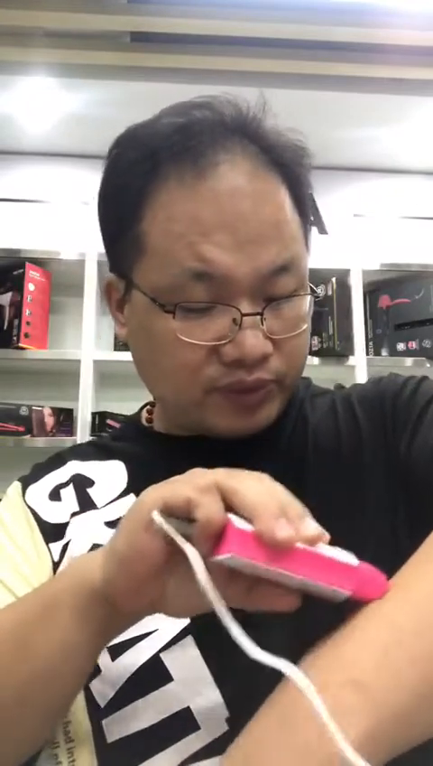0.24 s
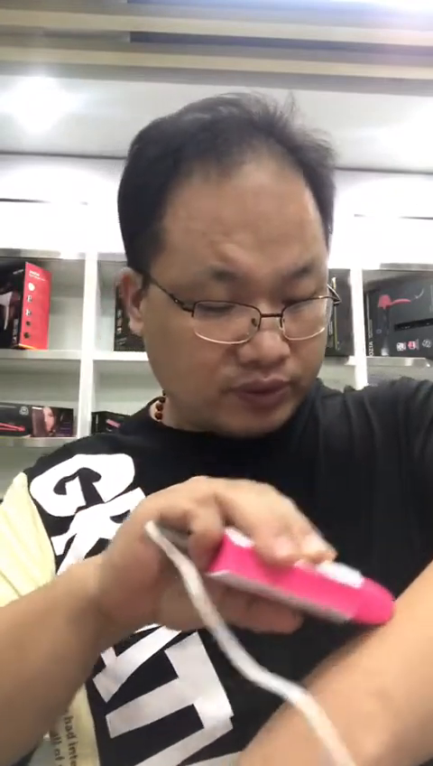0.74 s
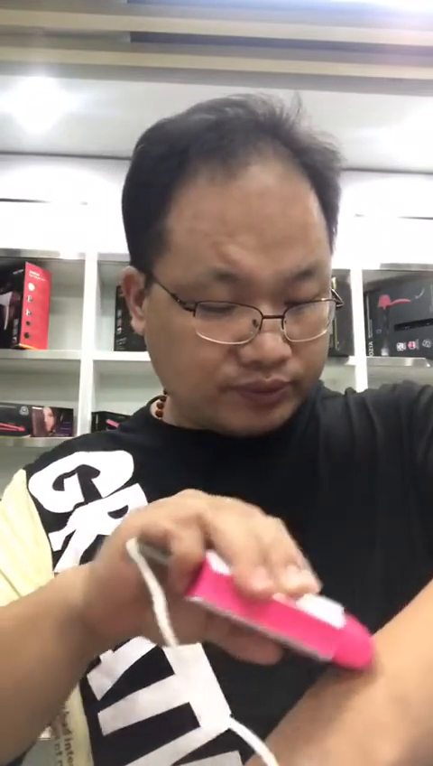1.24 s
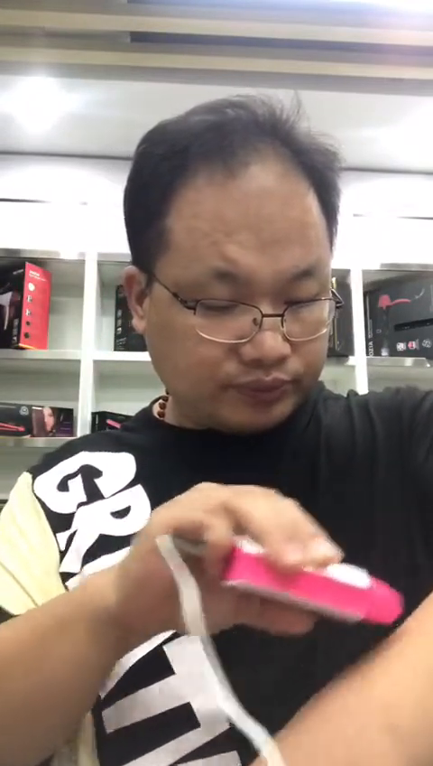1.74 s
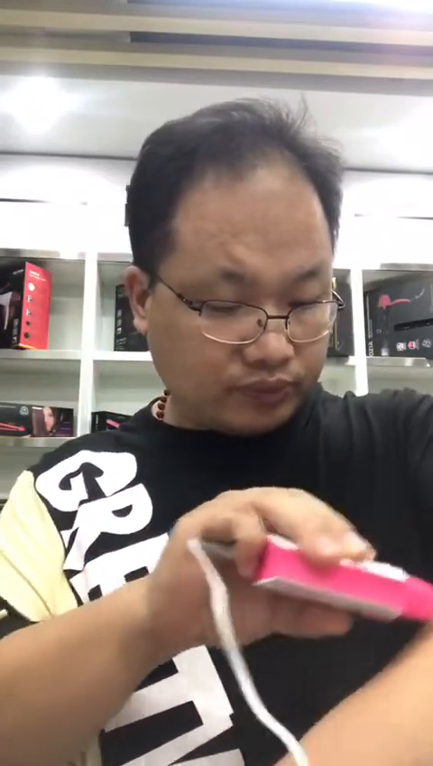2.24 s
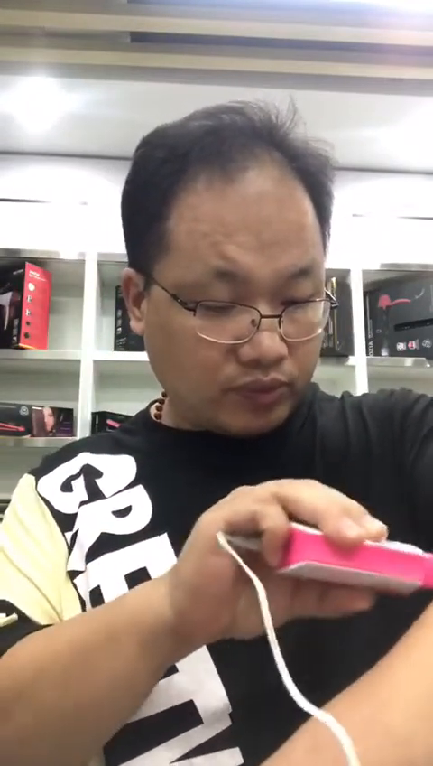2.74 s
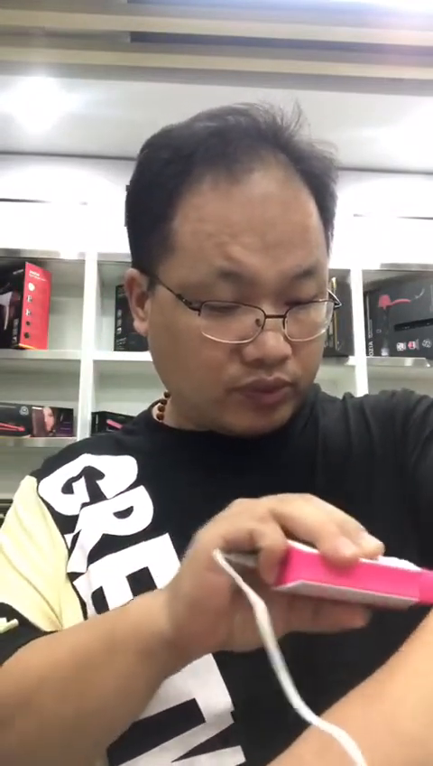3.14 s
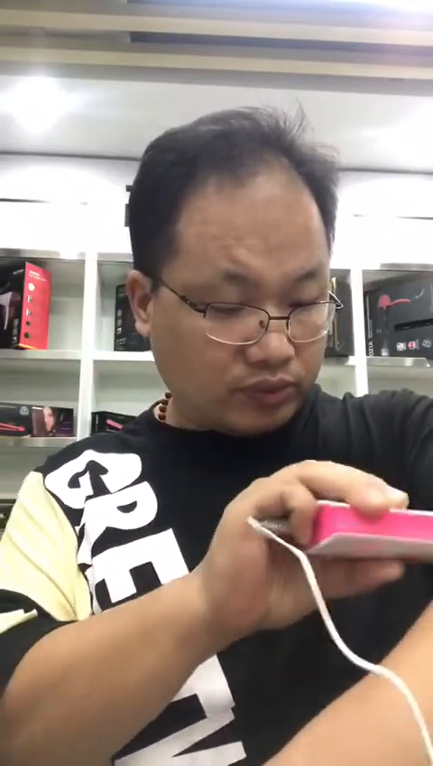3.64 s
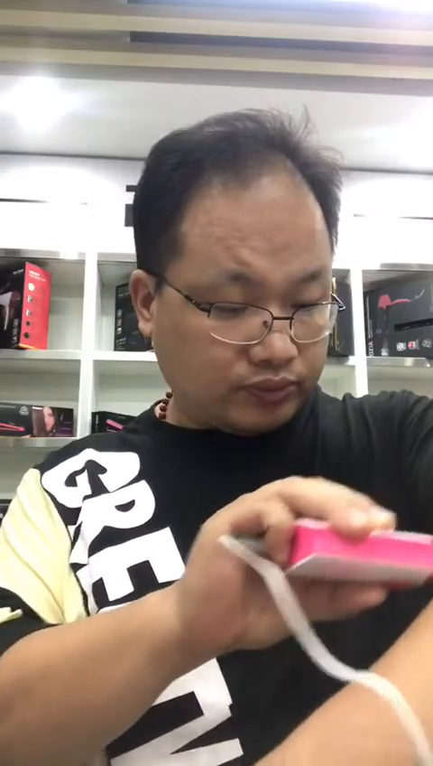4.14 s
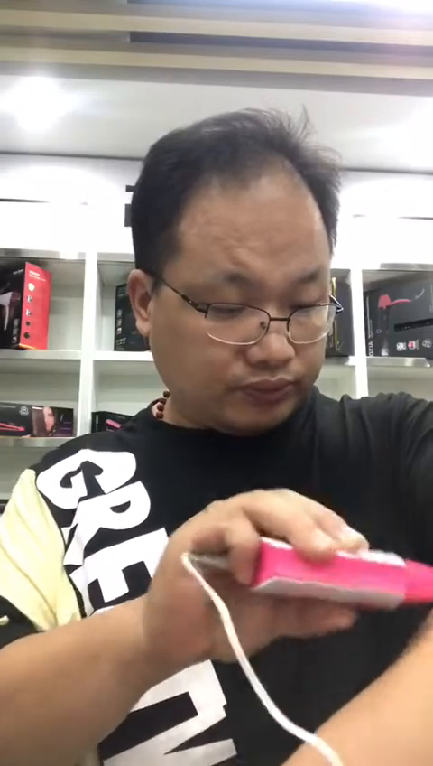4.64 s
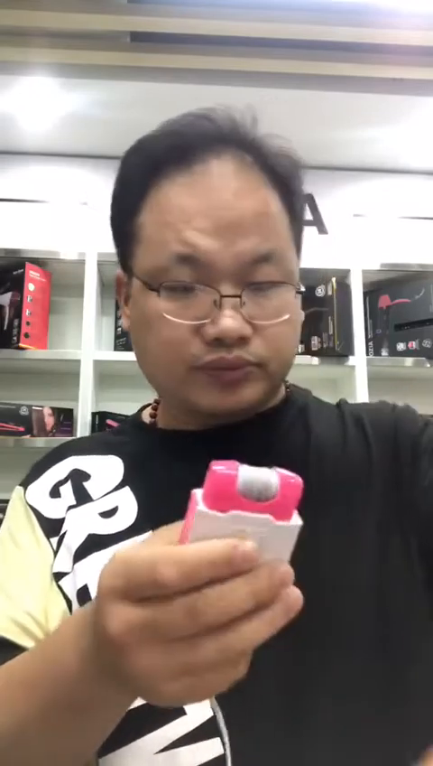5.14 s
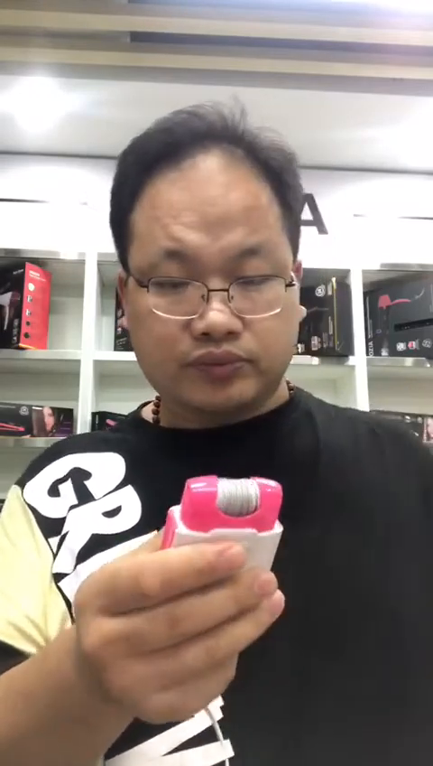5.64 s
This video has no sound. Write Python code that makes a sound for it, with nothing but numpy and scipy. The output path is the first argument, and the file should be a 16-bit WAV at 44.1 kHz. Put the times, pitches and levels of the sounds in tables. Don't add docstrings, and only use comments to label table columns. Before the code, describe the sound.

Close, phone-like, essentially mono capture of a handheld hair-removal device indoors. A dense metallic buzz with high motor whine runs continuously, with tiny pitch dips and bright crackly bursts while on skin. After leaving the arm it sounds more open and tonal, with a faster once-per-turn throb. Just before the end the power cuts and the motor droops, over soft low room ventilation.

```python
import sys
import numpy as np
from scipy import signal
from scipy.fft import rfft, irfft
from scipy.io import wavfile
from scipy.ndimage import uniform_filter1d

SR = 44100
rng = np.random.default_rng(int(sys.argv[2]) if len(sys.argv) > 2 else 0)


def file_out(sig):
    cols = np.atleast_2d(sig).T
    lim = np.clip(cols, -1, 1)
    pcm = np.round(lim * 32767).astype(np.int16)
    wavfile.write(sys.argv[1], SR, pcm)


def level_to_linear(level):
    exponent = np.asarray(level, float) / 20
    return 10 ** exponent


N = 259119
TEETH, CLAPS = 26, 6
MOTOR_ORDER = 4.52

# (time [s], share [0-1])
FACING = [
    (0, 0),
    (4.6, 0),
    (5.0, 0.97),
    (5.88, 0.9),
]
# (time [s], loss [dB], half length [s])
HIDDEN = [
    (1.3, -6, 0.099),
    (1.9, 12, 0.14),
    (2.5, -1.5, 0.86),
    (3.3, 10.5, 0.27),
    (4.2, 3.5, 0.17),
    (4.43, -1, 0.076),
    (1, 0, 0.13),
    (5.63, -0.5, 0.12),
    (5.2, 6, 0.12),
]


def rms_one(x):
    return x / np.sqrt(np.mean(x ** 2) + 1e-20)


def in_time(rows, at):
    s, *columns = np.transpose(rows)
    return [np.interp(at, s, c) for c in columns]


def at_hz(points, hz):
    point_hz, level_db = np.array(points).T
    return np.interp(np.log(hz + 1), np.log(point_hz), level_db)


def bell(hz, mid_hz, width_hz):
    return np.exp(-.5 * ((hz - mid_hz) / width_hz * 2) ** 2)


def bumps(rows, at):
    return sum(height * np.clip(1 - abs(at - s) / half_s, 0, 1) for s, height, half_s in rows)


def drift(rate):
    r = np.exp(-80 * np.pi * rate / SR)
    slow = signal.lfilter([1], [1, -2 * r, r * r], rng.standard_normal(N // 40 + 2002))[2000:]
    return np.interp(np.arange(N) / 40, np.arange(len(slow)), rms_one(slow))


def per_turn(turns, size):
    pattern = np.resize(rng.standard_normal(size), size + 1)
    return np.interp(turns % 1 * size, np.arange(size + 1), pattern)


def coasting(at):
    switch_off_s, halving_s = 5.675, .19
    knee_s = .013
    return 1 / (1 + knee_s * np.logaddexp(0, (at - switch_off_s) / knee_s) / halving_s)


def drive(s):
    # (time [s], mesh rate [Hz])
    pressure = [(0.05, 904), (.25, 901.5), (.4, 899.3), (.6, 903.6), (.75, 906.6), (1.05, 897),
                (1.2, 902.2), (1.55, 903.3), (1.75, 903.3), (2.1, 901.1), (2.4, 896.3), (2.95, 896),
                (3.1, 895.4), (3.45, 906), (3.7, 898.7), (3.9, 895.9), (4.3, 897.9), (4.5, 898.6),
                (4.7, 905.2), (4.9, 899.5), (5.0, 900), (5.18, 900.5), (5.35, 898.9), (5.5, 893.3),
                (5.88, 900)]
    # (time [s], mesh drop [Hz], half length [s])
    snags = [
        (.14, 11, .07),
        (.88, 5, 0.06),
        (1.37, 30, .12),
        (2.33, 5, 0.059),
        (2.7, 7, .07),
        (3.0, 3, .05),
        (3.58, 14, 0.061),
        (4.4, 15, .09),
        (5.665, 10, .05),
    ]
    mesh_hz = (in_time(pressure, s)[0] - bumps(snags, s)) * coasting(s)
    turns = np.cumsum(uniform_filter1d(mesh_hz, size=1300)) / SR / TEETH
    notch_s = 5.459
    return mesh_hz, turns - turns[int(notch_s * SR)] + .5


def contacts(turns, repeat, clap_db, wobble_db, grain_db):
    clap = np.pi * CLAPS * turns
    gate_db = clap_db * (.8 * np.cos(2 * clap) + np.cos(clap) + .4 * np.cos(4 * clap))
    gate_db = gate_db + wobble_db * per_turn(turns, size=13)
    low_hz, high_hz = 5600, 11000
    fresh = np.zeros(N)
    for edge, kind in ((low_hz, "low"), ((low_hz, high_hz), "band"), (high_hz, "high")):
        part = signal.butter(4, edge, kind, fs=SR, output="sos")
        grains = level_to_linear(gate_db + grain_db * drift(155)) * rng.standard_normal(N)
        fresh += signal.sosfilt(part, grains)
    fine_marks = signal.butter(4, 1600, "high", fs=SR, output="sos")
    marks = signal.sosfilt(fine_marks, per_turn(turns, size=1200))
    return np.sqrt(1 - repeat) * rms_one(fresh) + np.sqrt(repeat) * rms_one(marks)


def rattle_levels(at, facing):
    # (time [s], rattle level [dB], upper casing uncovered [dB])
    grip = [(0, -0.5, 2), (.5, 1, 1), (.85, 0.5, 0), (1.2, 0.5, 1), (1.45, 0.5, -2), (1.6, 1.5, 2),
            (2.0, 0, -1.5), (2.3, 0, 2.5), (2.7, 0.5, -0.5), (3.0, 0.5, 1), (3.25, 0, 0), (3.5, 0.5, -1),
            (4.1, 0.5, -0.5), (4.5, 0, -1), (4.7, 0, 0.5), (4.85, -0.5, 0), (5.3, 1.5, 2.5), (5.7, 0, 0)]
    # (on skin [dB], in air [dB], share of the uncovering, power of speed, loose parts rattle on [s])
    regions = [
        (-54.5, -52, .3, 1.07, .005),
        (-49.5, -49.5, -0.3, 1.45, 0.03),
        (-51.5, -53.5, 1., 1.5, 0.02),
        (-54.5, -52, -0.15, 2.02, 0.033),
    ]
    # (time [s], top region lift [dB], half length [s])
    plucks = [(.1, 1.5, 0.054), (.68, -1, .1), (1.23, 4, 0.072), (2.25, 4, 0.11), (2.55, 3, 0.11),
              (3.05, 2.5, 0.11), (3.52, 2, 0.044), (4.45, 0.5, 0.11), (1.6, 1.5, .1), (4.62, 1, .06),
              (3.8, 2, 0.063)]
    # (time [s], loss [dB], half length [s])
    lift_off = [
        (4.83, 5.5, 0.12),
    ]
    level_db, uncovered_db = in_time(grip, at)
    levels = []
    for skin_db, air_db, share, power, lag_s in regions:
        aim_db = skin_db + (air_db - skin_db) * facing
        speed_db = power * 20 * np.log10(coasting(at - lag_s))
        levels.append(aim_db + level_db + share * uncovered_db + speed_db)
    stubble_db = 1 * np.interp(at * SR, np.arange(N), drift(6.))
    hidden_db = -.16 * bumps(HIDDEN, at)
    return np.array(levels) + [hidden_db, -bumps(lift_off, at), 0 * at, bumps(plucks, at) + stubble_db]


def casing(x, patchy_db, low_trim_db):
    # (frequency [Hz], level [dB per Hz])
    on_skin = [(290, -49), (500, -22), (1440, -7.5), (1640, -10.5), (1750, -9.5), (2660, 0), (3060, -7.5),
               (4220, -7.5), (4920, -10.5), (6500, -8), (7580, -11.5), (9090, -7), (14000, -16.5)]
    # (frequency [Hz], level [dB per Hz])
    in_air = [(290, -78), (500, -30.5), (815, -17.5), (963, -25), (1030, -18), (1570, -16.5), (2450, -6),
              (2660, 3.5), (3020, -7), (5420, -10.5), (7480, -18), (9090, -21.5), (14000, -26.5)]
    # (frequency [Hz], width [Hz], on skin [dB], in air [dB])
    resonances = [(2582, 550, -2, -7.5), (4270, 610, -0.2, 0.5), (4564, 280, 1.5, 4), (3010, 220, -2, 0),
                  (5340, 500, 3.5, 4), (6530, 580, 2.5, 3.5), (8930, 600, 0, 6), (10020, 480, 1.5, 2),
                  (11570, 1300, 3.5, 6.5), (14040, 390, 6, 4), (5080, 270, -0.5, -2), (7590, 260, -1, -2),
                  (10440, 260, -4.5, -5), (13400, 460, 3, 5.5), (1870, 220, 1, -3.5),
                  (12830, 550, 5.5, 2.5)]
    # (time [s], resonance [Hz], lift [dB])
    pocket = [(0.0, 4000, 4.5), (.3, 4100, 4), (.65, 3980, 6.5), (.85, 4000, 2.5), (1.05, 4150, 6.5),
              (1.45, 4250, 5), (1.6, 4050, -1.5), (1.85, 4300, 3.5), (2.0, 4500, 3.5), (2.2, 4000, 0.5),
              (2.43, 4212, 7), (2.6, 4000, 0), (2.8, 4260, 4.5), (2.97, 4205, 1.5), (3.12, 3870, 3),
              (3.25, 4400, 2.5), (3.45, 4300, 1.5), (3.6, 4060, 3.5), (3.8, 4270, 2.5), (4.1, 4327, 5),
              (4.25, 4048, 3), (4.42, 4306, 6), (4.55, 3950, 3.5), (4.66, 3840, 1.5), (4.76, 3850, 5),
              (4.8, 3794, 0)]
    regions_hz = (2300, 4200, 6200, 10000)
    # (time [s], frequency [Hz], lift [dB], half length [s], width [Hz])
    panels = [(.3, 2950, -2, 0.27, 420), (0.34, 2200, -2.5, 0.27, 400), (.98, 4500, 1.5, .07, 170),
              (1.1, 4480, 2, 0.33, 250), (1.1, 3650, 3.5, .15, 330), (1.7, 2400, -4, 0.41, 350),
              (2, 3650, 2, 0.13, 340), (2.1, 4600, 2, .15, 300), (3, 4000, -4, .12, 220),
              (4.15, 1800, 1.5, .2, 660), (6.4, 4550, -2, .1, 300), (5.47, 4550, -3.5, 0.11, 300),
              (2.9, 2250, 2, 0.58, 400), (3.1, 1650, -4.5, 0.58, 140), (3.15, 4600, 2.5, .25, 360),
              (3.1, 5400, -4, .15, 400), (3.8, 1650, -4, .35, 160), (4.35, 3200, 2, 0.26, 370),
              (4.66, 3800, 4, 0.11, 180), (4.7, 2200, 3.5, 0.22, 550), (5.3, 1600, -3.5, .25, 200),
              (5.27, 4550, 4, .08, 200), (5.14, 4650, 5, .05, 200), (5.05, 5550, 3, .07, 250),
              (5.2, 2200, 2.5, 0.18, 450), (1.8, 1400, 2, .15, 400), (5.3, 4700, 1, .2, 250),
              (4.4, 4600, 4, .06, 280), (6.8, 4000, 1.5, .3, 440), (5.72, 1850, -7.5, 0.17, 310),
              (6.6, 450, -4, .45, 170)]

    hz, s, frames = signal.stft(x, SR, nperseg=1024, noverlap=768)
    facing, = in_time(FACING, s)
    colours = np.array([at_hz(on_skin, hz), at_hz(in_air, hz)])
    for mid_hz, width_hz, *lift_db in resonances:
        colours += np.outer(lift_db, bell(hz, mid_hz, width_hz))
    shape_db = np.outer(colours[0], 1 - facing) + np.outer(colours[1], facing)

    pocket_hz, pocket_db = in_time(pocket, s)
    dip = .45 * bell(hz[:, None], 4930, 300)
    shape_db += pocket_db * (1 - facing) * (bell(hz[:, None], pocket_hz, 550) - dip)

    levels = rattle_levels(s, facing)
    levels[0] += low_trim_db
    place = np.interp(np.log(hz + 1), np.log(regions_hz), np.arange(4))
    for k, level_db in enumerate(levels):
        weight = np.clip(1 - abs(place - k), 0, 1)
        own_db = 10 * np.log10(weight @ level_to_linear(shape_db) ** 2 / len(hz))
        shape_db = shape_db + np.outer(weight, level_db - own_db)
    for at_s, mid_hz, lift_db, half_s, width_hz in panels:
        shape_db += np.outer(bell(hz, mid_hz, width_hz), bumps([(at_s, lift_db, half_s)], s))

    patches = rng.standard_normal(frames.shape)
    for axis, size in ((0, 7), (0, 7), (1, 20), (1, 20)):
        patches = uniform_filter1d(patches, size=size, axis=axis)
    depth_db = patchy_db * (1 + .3 * (hz[:, None] / regions_hz[-1]) ** 2)
    coloured = frames * level_to_linear(shape_db + depth_db * rms_one(patches))
    return signal.istft(coloured, SR, nperseg=1024, noverlap=768)[1][:N]


def mesh_levels(at):
    # (time [s], third multiple [dB], second multiple [dB])
    aim = [(0, -49.5, -65), (.17, -51, -59.5), (.9, -51, -62.5), (1.2, -50.5, -60), (1.45, -52.5, -60),
           (1.78, -50.5, -61.5), (1.85, -60, -58), (2.2, -51.5, -60.5), (2.65, -53, -62.5), (2.8, -60, -62),
           (3.0, -46.5, -59.5), (3.2, -62, -62), (3.4, -53.5, -57), (3.8, -56.5, -60.5), (4.15, -54, -65),
           (4.85, -55.5, -57.5), (5.03, -45, -64), (5.55, -44.5, -72)]
    # (time [s], loss of third multiple [dB], of second [dB], half length [s])
    slack_moments = [(1.184, -1, 20, 0.034), (1.673, 15, 5, 0.047), (1.728, -1, 11, 0.04),
                     (2.077, 12, -4.5, 0.079), (2.42, 13, 4, 0.082), (2.667, -7, -2, 0.072),
                     (3.601, 0.5, 1.5, 0.076), (3.845, 6, 4, 0.041), (0.153, -3.5, -6.5, 0.055),
                     (0.255, 6, 7, 0.044), (3.975, -2, -2.5, 0.079), (.5, -0.5, -4, 0.083),
                     (0.997, -2, -1, 0.044), (1.47, -3.5, -3.5, 0.056), (1.62, -1, 7, 0.088),
                     (2.57, -2, -2, 0.046), (5.053, 1.5, 4, .06), (4.07, -1.5, 1, .06),
                     (4.556, -3, -2, .08), (4.972, 3, 0.5, 0.092), (5.16, 1.5, -1.5, 0.069),
                     (4.2, 4, 6, 0.05), (4.39, 11, -2, 0.08), (4.804, 15, -1.5, 0.083), (5.617, 2, -7, .02),
                     (5.646, -2.5, 0, .02), (5.74, 20.5, 1, 0.035)]
    slack = np.array(slack_moments)
    loss_db = [bumps(slack[:, [0, column, -1]], at) for column in (1, 2)]
    coast_db = 5.3 * 20 * np.log10(coasting(at - .02))
    unload_db = 6 * np.clip((at - 5.6) / .03, 0, 1)
    return in_time(aim, at) - np.array(loss_db) + coast_db - unload_db


def whine(turns, third_db, second_db, facing, waver, flutter_db):
    # (time [s], once-a-turn run-out share [0-1])
    looseness = [
        (0, 0),
        (4.98, 0),
        (5.22, .2),
        (5.36, 1),
        (5.6, 1),
        (5.63, .2),
        (5.88, .2),
    ]
    angle = 2 * np.pi * turns
    loose, = in_time(looseness, np.arange(N) / SR)
    free = facing ** 6
    runout = 1 + (.15 + .22 * loose) * np.exp(-1j * (angle - .3))
    runout = runout - (.034 + .15 * free + .1 * loose) * np.exp(-2j * angle)
    runout = runout + (.087 + .06 * loose) * np.exp(1j * angle)
    runout = runout - (.06 + .12 * free) * np.exp(2j * angle)
    runout = runout + (.06 + .26 * free) * np.cos(3 * angle)
    out = level_to_linear(third_db - 17.5) * np.cos(14 * MOTOR_ORDER * angle + waver * drift(16.0))
    multiples = (
        (3, third_db - .5 * (1 - facing), runout, -14 + 2 * facing - 6 * loose, .5),
        (2, second_db, 1, -8, .9),
    )
    for multiple, level_db, beat, neighbour_db, shake in multiples:
        mesh = np.exp(1j * (multiple * TEETH * angle + waver * drift(30.6)))
        tone = mesh * (beat + level_to_linear(neighbour_db) * np.exp(1j * MOTOR_ORDER * angle))
        out += level_to_linear(level_db + flutter_db * shake * drift(12)) * tone.real
    return np.sqrt(2) * out


def clap_levels(at, facing):
    fourth_db = -72.5 + (-60 + 72.5) * facing
    sixth_db = -68 + (-70 + 68) * facing
    sag_db = 12 * np.clip(at - FACING[2][0], 0, None)
    return fourth_db - sag_db - bumps(HIDDEN, at), sixth_db


def hum(turns, facing, running, flutter_db):
    # (multiple of drum turn, on skin [dB], in air [dB], share of fourth, share of sixth clap multiple)
    drum_orders = [(12, -79, -88, 0, 0), (13, -84, -90.5, 0, 0), (18, -90, -78, 0, 0), (14, -83, -92, 0, 0),
                   (20, -79.5, -74.5, 0, 0), (24, .5, 2.5, 1, 0), (25, -80.5, -71, 0, 0),
                   (26, -78, -72, 0, 0), (30, .5, 3, .5, .5), (36, -.5, 2, 0, 1), (42, -1, -1, 0, 1)]
    # (time [s], order, lift [dB], half length [s])
    swells = [(.7, 12, -7, .15), (1.3, 12, 4, .35), (2.7, 12, 2, .3), (4.1, 12, 2, .15), (4.7, 12, -5, .3),
              (1.3, 26, 5, .12), (2.4, 26, 5, .3), (2.9, 26, 4, .15), (3.7, 26, 8, .15), (4.05, 26, 8, .12),
              (4.4, 26, 9, .16), (5.2, 26, 2, .3), (2.3, 24, 3, .2), (1.25, 30, 2, .1), (1.7, 30, 3, .1),
              (2.9, 30, 3, .12), (5.5, 30, -2, .15), (5.3, 25, -3, .4)]
    s = np.arange(N) / SR
    fourth_db, sixth_db = clap_levels(s, facing)
    out = np.zeros(N)
    for order, skin_db, air_db, fourth, sixth in drum_orders:
        level_db = skin_db + (air_db - skin_db) * facing + fourth * fourth_db + sixth * sixth_db
        level_db = level_db + flutter_db * (1 - 1.3 * facing) * drift(5)
        own_swells = [(at_s, db, half_s) for at_s, k, db, half_s in swells if k == order]
        level_db = level_db + bumps(own_swells, s)
        waver = drift(9.0) * (.55 - .3 * facing)
        out += level_to_linear(level_db) * np.sin(2 * np.pi * order * turns + waver)
    return np.sqrt(2) * running ** 9.0 * out


def shop():
    # (frequency [Hz], level [dB per Hz])
    rumble = [(12, -57), (24, -22), (36, -6.5), (50, 2.5), (68, -1.5), (93, 2), (108, -0.5), (224, -3.5),
              (296, -2), (333, -4.5), (408, -4), (650, -15), (840, -22.5), (1430, -120)]
    hz = np.arange(N // 2 + 1) * SR / N
    air = irfft(rfft(rng.standard_normal(N)) * level_to_linear(at_hz(rumble, hz)), N)
    return level_to_linear(-68.5) * rms_one(air)


def scene():
    s = np.arange(N) / SR
    facing, = in_time(FACING, s)
    mesh_hz, turns = drive(s)
    chatter = contacts(turns, repeat=.12, clap_db=.8, wobble_db=.5, grain_db=1.1)
    rattle = casing(chatter, patchy_db=1.0, low_trim_db=3.5)
    third_db, second_db = mesh_levels(s)
    tones = whine(turns, third_db, second_db, facing, waver=.12, flutter_db=1.2)
    tones = tones + hum(turns, facing, mesh_hz / 900, flutter_db=2.2)
    return np.tile(rattle + tones + shop(), (2, 1))


def phone_grain(x):
    # (frequency [Hz], step against the neighbourhood level [dB])
    coarseness = [(300, -14.), (2000, -6.), (3000, -1.), (5000, 2.), (7500, 4.), (10000, 6.5), (12000, 7.5),
                  (14000, 9.)]
    half = 1024
    n, k = np.arange(2 * half) + .5, np.arange(half) + .5
    window = np.sin(np.pi * n / half / 2)[:, None]
    basis = window * np.cos(np.pi / half * np.outer(n + half / 2, k)) * np.sqrt(2 / half)
    blocks = np.pad(x, (half, 2 * half - N % half)).reshape(-1, half)
    lines = np.hstack([blocks[:-1], blocks[1:]]) @ basis
    hz = k * SR / half / 2
    around = uniform_filter1d(uniform_filter1d(lines ** 2, size=120, axis=1), size=3, axis=0)
    step = level_to_linear(at_hz(coarseness, hz)) * np.sqrt(around + 1e-20)
    lines = np.sign(lines) * np.floor(abs(lines) / step + .4) * step
    lines = lines * (hz < 14160)
    frames = lines @ basis.T
    return (frames[:-1, half:] + frames[1:, :half]).ravel()[:N]


def roll_off(x):
    return signal.sosfilt(signal.butter(12, 14500, fs=SR, output="sos"), x)


def record(dry):
    end_fade_s = .0015
    fade = np.clip((N - np.arange(N)) / SR / end_fade_s, 0, 1)
    split_s, split_hz, split_db = 5.3, (4150, 5350), -52
    swell = np.cos(np.pi / 2 * np.clip((np.arange(N) - split_s * SR) / 1024, -1, 1))
    split_band = signal.butter(6, split_hz, "band", fs=SR, output="sos")
    split = rms_one(signal.sosfilt(split_band, rng.standard_normal(N)))
    opposed = level_to_linear(split_db) * swell * split * [[1], [-1]]
    return roll_off(phone_grain(dry[0]) * fade + opposed)


dry = scene()
out = record(dry)
file_out(out)
```